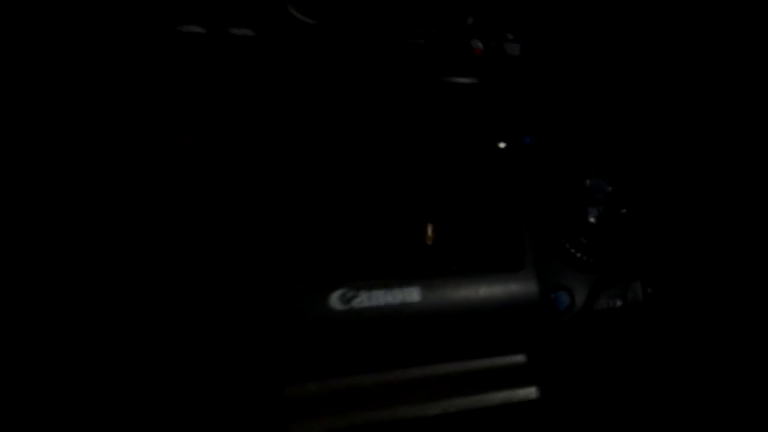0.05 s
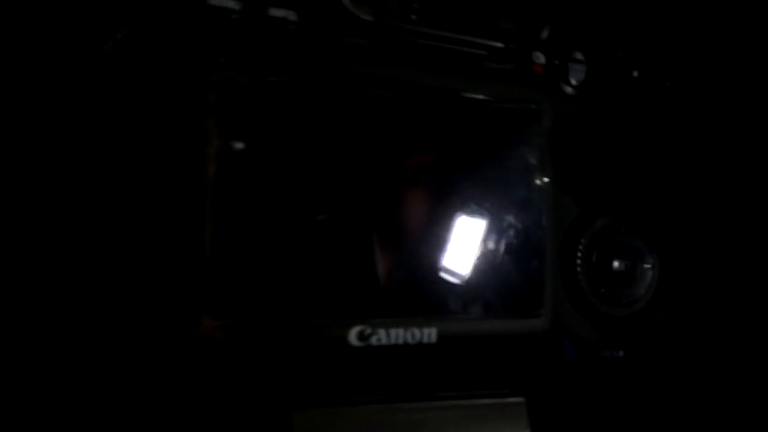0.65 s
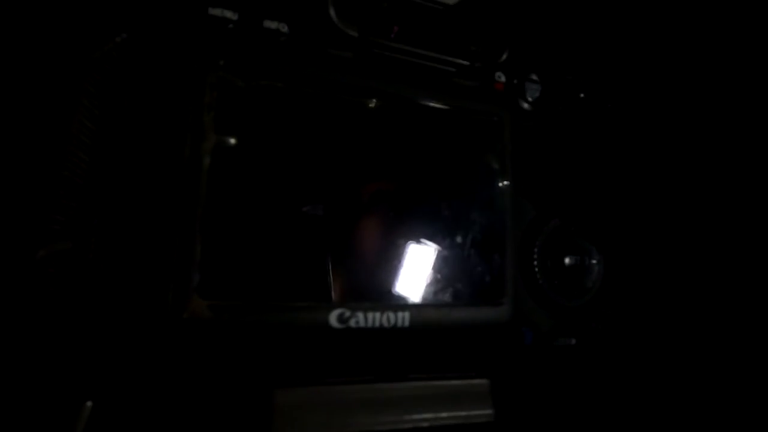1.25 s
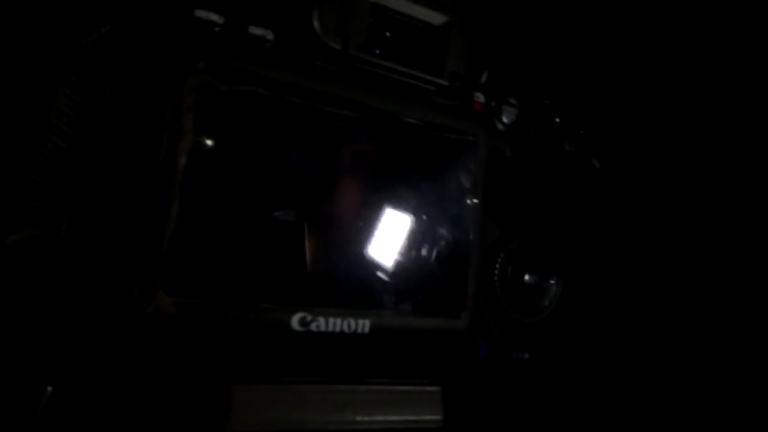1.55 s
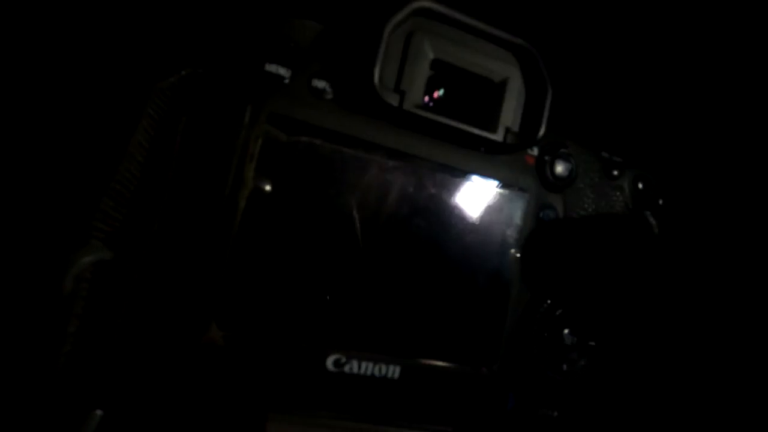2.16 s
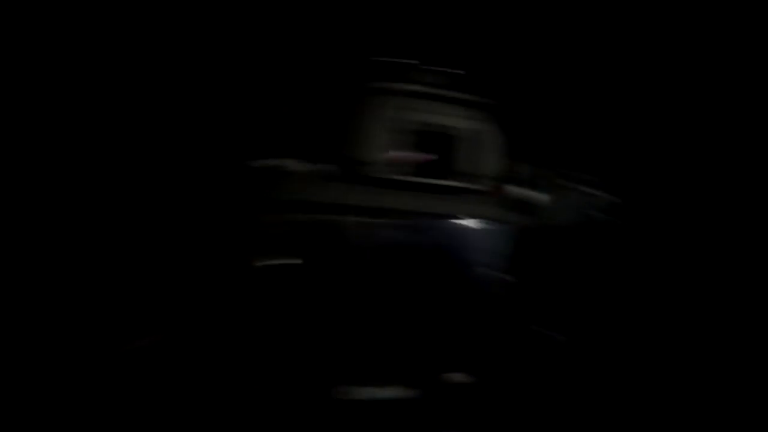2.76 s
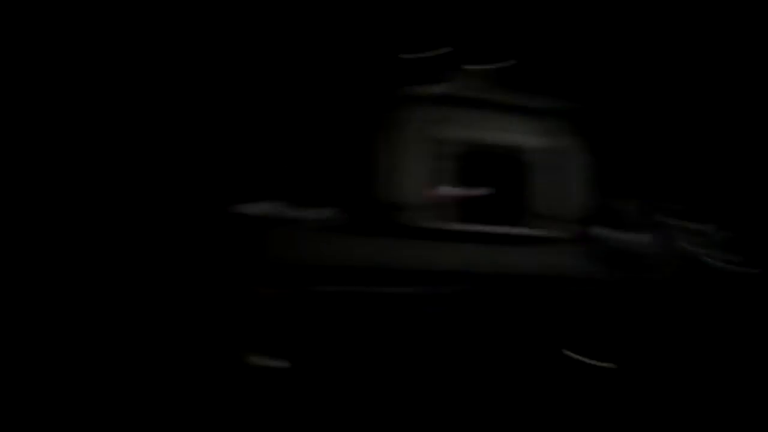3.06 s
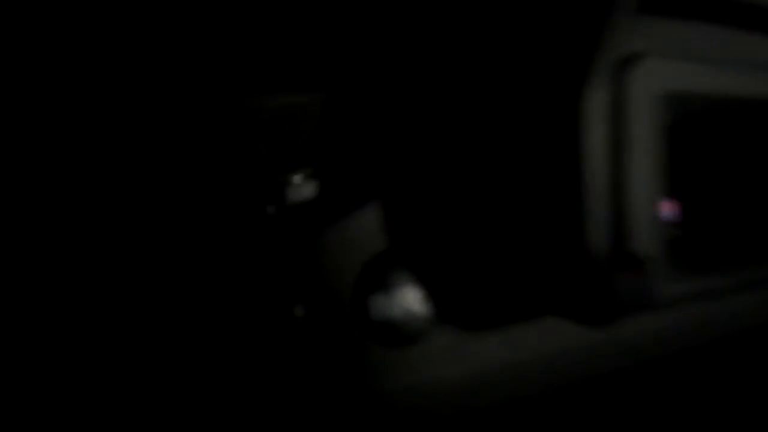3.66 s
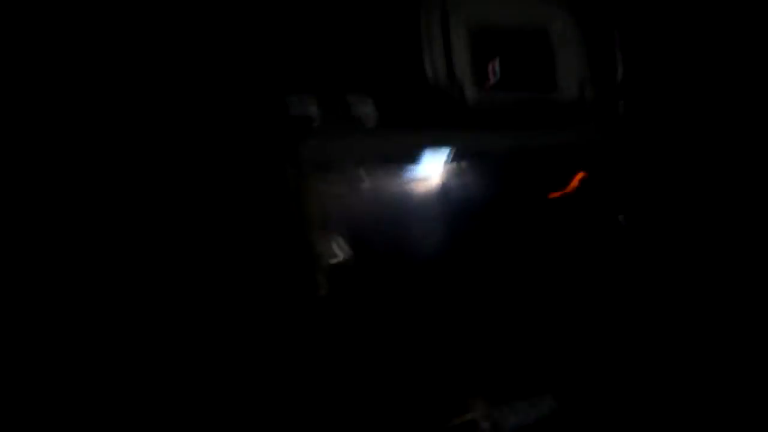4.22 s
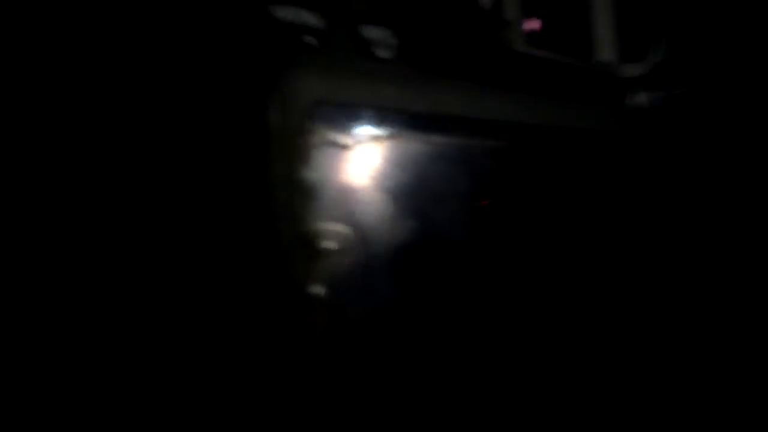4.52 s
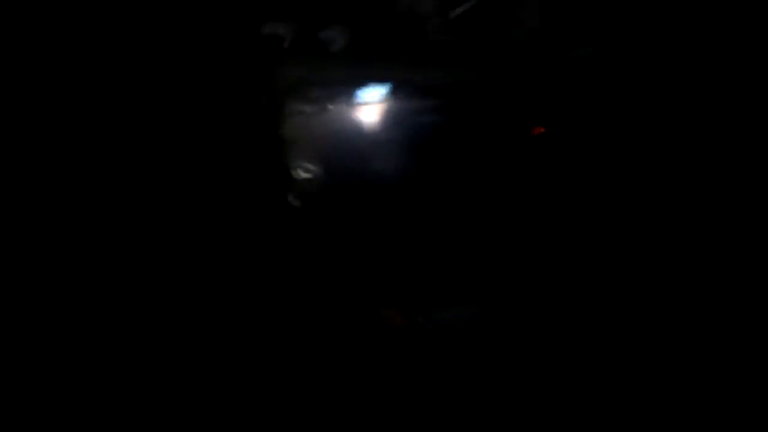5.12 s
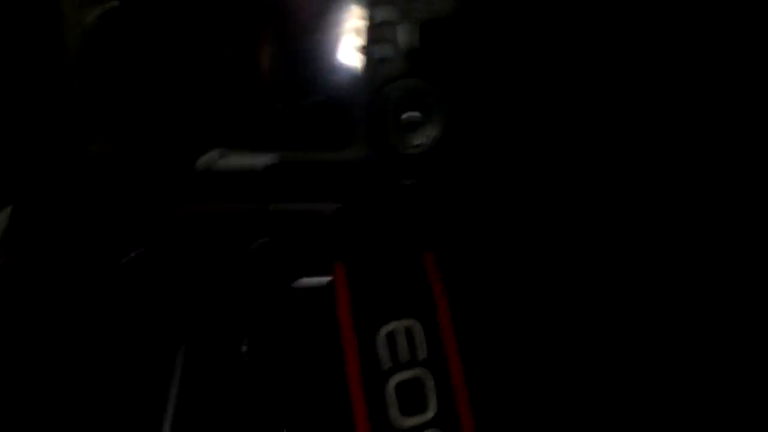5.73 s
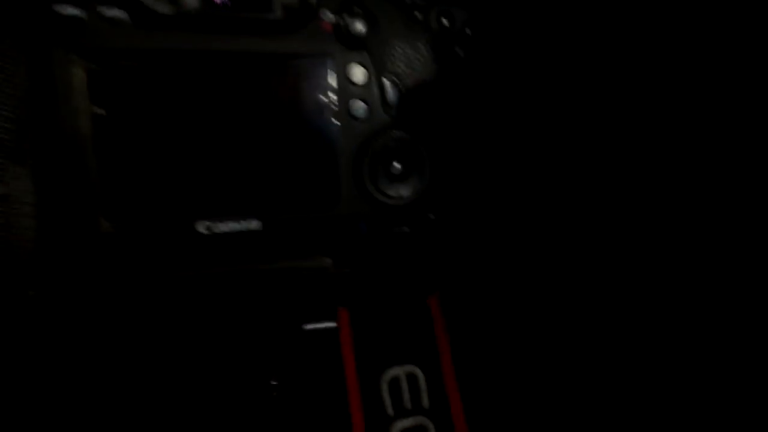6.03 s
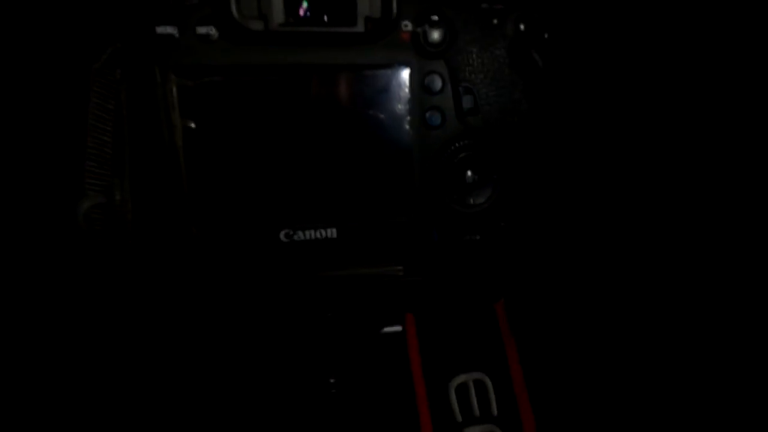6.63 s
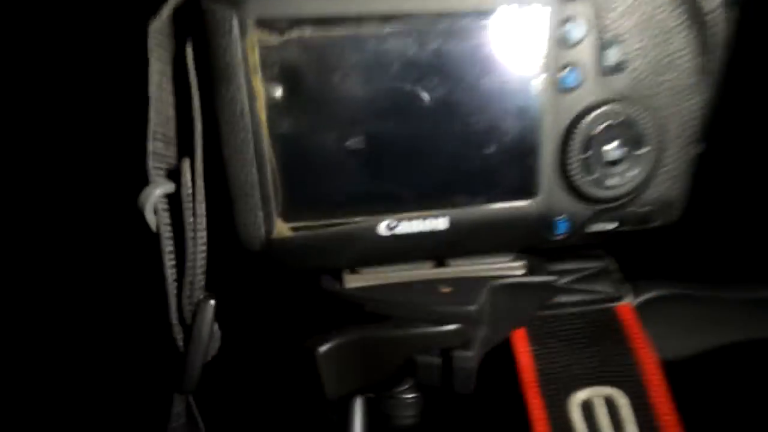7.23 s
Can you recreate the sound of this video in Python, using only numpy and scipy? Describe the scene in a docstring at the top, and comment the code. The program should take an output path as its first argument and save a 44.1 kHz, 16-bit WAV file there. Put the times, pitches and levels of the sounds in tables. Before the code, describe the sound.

Irregular clicks and thumps of a camera being fitted onto a tripod, over soft sleeve and strap swishing and low handling rumble.

```python
"""Seating a camera on a tripod

A camera is handled right at the microphone. Impacts and friction excite the damped modes of its
plastic casing, which knocks, scrapes and thumps on the mount; the foot squeaks by stick-slip, the
metal plate slides home, the latch snaps, and strap fittings tick and clink. Sleeve and strap swish
with every move and the hands rumble through the housing, over a faint outdoor background."""
import sys
import numpy as np
from scipy import signal
from scipy.fft import rfft, irfft, next_fast_len
from scipy.io import wavfile
from scipy.ndimage import uniform_filter1d, map_coordinates

SR = 44100
rng = np.random.default_rng(int(sys.argv[2]) if len(sys.argv) > 2 else 0)


def dump(signal):
    """Clip the signal to [-1, 1] and save it as 16-bit WAV at the path in sys.argv[1]."""
    limited = np.clip(np.atleast_2d(signal).T, -1, 1)
    pcm = np.round(limited * 32767).astype(np.int16)
    wavfile.write(sys.argv[1], SR, pcm)


N = 321162

# hard contacts (time [s], pitch of the struck spot [Hz], low [dB], mid [dB], high [dB], jolt [dB])
KNOCKS = [(0.666, 2380, -58, -43, -77, -62), (0.72, 2440, -33, -30.5, -56, -38),
          (0.763, 2250, -40.5, -34, -56, -48.5), (0.7724, 1340, -58, -49, -62, -69),
          (1.391, 1000, -46, -46, -67, -68), (1.884, 2100, -33, -25.5, -52.5, -36.5),
          (1.9123, 2140, -37.5, -28, -41, -29), (1.9261, 660, -40.5, -43, -60, -34),
          (1.9319, 2790, -36, -33.5, -49.5, -34), (2.14, 660, -47.5, -51, -61.5, -57),
          (2.1528, 960, -45, -45.5, -60, -48.5), (2.2682, 2370, -45, -36, -54.5, -36.5),
          (2.4729, 900, -51.5, -53, -68, -46.5), (2.5699, 2230, -52.5, -42.5, -50, -42.5),
          (2.871, 2690, -51, -49, -61, -65.5), (3.053, 2160, -46, -37.5, -44, -56.5),
          (3.3349, 2390, -36.5, -25.5, -33, -29), (3.423, 890, -20.5, -27.5, -42.5, -25),
          (3.457, 1180, -20, -30, -48, -35), (3.6457, 2990, -38, -46, -41.5, -43),
          (3.7134, 2780, -32, -28, -54.5, -43), (3.7578, 1010, -41.5, -56, -71, -47.5),
          (4.3886, 520, -29.5, -42, -45, -34), (4.3982, 1070, -28.5, -38, -32.5, -30.5),
          (4.5109, 2130, -48, -51, -65, -42)]
# drags over the mount (start [s], end [s], pitch of the rubbed spot [Hz], low [dB], mid [dB], high [dB])
SCRAPES = [(2.218, 2.263, 2450, -56, -53, -60.5), (2.288, 2.3, 590, -47.5, -50, -52.5),
           (2.887, 2.931, 1730, -63, -54.5, -63), (3.368, 3.454, 1740, -48, -41, -53.5),
           (3.446, 3.468, 1120, -30.5, -37.5, -44), (3.499, 3.665, 860, -48.5, -52, -62.5),
           (3.597, 3.831, 2780, -46, -51, -61.5), (3.851, 3.875, 776, -47, -60.5, -67.5),
           (3.912, 3.936, 750, -56, -66, -74), (4.357, 4.422, 500, -35.5, -46, -47.5),
           (4.588, 4.641, 1425, -49, -43, -55.5), (4.809, 4.851, 1710, -63, -53.5, -64),
           (4.981, 5.12, 435, -51.5, -45, -64.5), (5.04, 5.156, 1037, -44.5, -43, -56.5)]
# light contacts of strap fittings and fingernails (time [s], mid [dB], high [dB])
TICKS = [(0.7115, -67, -53), (0.8969, -50, -54.5), (0.9305, -56, -76), (0.981, -88, -62),
         (1.3335, -63, -68), (1.379, -61, -83), (1.906, -63, -40.5), (2.2273, -57, -61),
         (2.2842, -43.5, -49.5), (2.6212, -45, -52), (2.673, -57, -54), (2.7268, -47.5, -52),
         (2.739, -53, -47), (2.7663, -47, -54), (2.8146, -49.5, -57), (3.063, -56, -53.5),
         (4.3988, -29.5, -32.5), (4.836, -50.5, -69), (4.9815, -48.5, -63)]
# low, mid and high bands of a contact (lower edge [Hz], upper edge [Hz])
CONTACT_BANDS = [(300, 1400), (1400, 3400), (3400, 15000)]
# soft bumps of the camera's weight on its support (time [s], level [dB], frequency [Hz])
BUMPS = [(1.557, -50, 130), (2.902, -48, 220), (2.945, -46.5, 100), (3.294, -37.5, 80), (3.431, -29.5, 243),
         (3.459, -30, 84), (3.481, -38.5, 135), (4.317, -27.5, 129), (4.372, -32, 124), (4.402, -30.5, 282),
         (4.589, -41, 130), (4.822, -46.5, 139), (5.355, -53.5, 200)]
# the foot squeaking on the mount (time [s], level [dB], pitch [Hz])
SQUEAK_CURVE = [(3.355, -66.5, 1600), (3.358, -40.5, 1598), (3.382, -33, 1700), (3.4, -40.5, 1640),
                (3.42, -37, 1670), (3.428, -71.5, 1647)]
# friction envelopes (time [s], level [dB])
PLATE_ENVELOPE = [(4.28, -67.5), (4.298, -42), (4.311, -27), (4.328, -32), (4.342, -38), (4.349, -34),
                  (4.368, -34.5), (4.39, -73), (4.41, -73.5)]
WEBBING_ENVELOPE = [(6.0, -83), (6.15, -68), (6.35, -66), (6.52, -55.5), (6.62, -50.5), (6.69, -61),
                    (6.735, -49.5), (6.79, -80), (6.85, -83.5)]
# taps of a loose fitting on the tripod (time [s], level [dB], crack relative to ring [dB])
LOOSE_TAPS = [(6.9288, -60, -4), (6.9706, -55, -6), (7.0102, -56.5, -23)]
# strokes of sleeve and strap (start [s], duration [s], rub [dB], swish [dB])
CLOTH_STROKES = [(-.07, .16, -62, -51), (.205, 0.14, -55.5, -53), (.385, 0.11, -60.5, -53.5),
                 (.51, 0.33, -64, -55.5), (.88, 0.066, -65.5, -59), (1.04, .22, -62, -64),
                 (1.3, 0.27, -60, -61.5), (1.6, 0.15, -64, -59.5), (1.8, 0.23, -57.5, -53),
                 (2.08, 0.24, -62, -57.5), (2.35, 0.11, -69, -63), (2.54, 0.24, -62.5, -59),
                 (2.69, 0.35, -60.5, -57), (2.95, 0.19, -57, -53), (3.12, 0.13, -55.5, -49.5),
                 (3.24, 0.097, -65.5, -50.5), (3.88, .11, -62, -58.5), (4.03, 0.48, -61, -53.5),
                 (4.44, 0.4, -57, -56.5), (4.73, 0.23, -60, -58), (4.95, 0.37, -54, -53),
                 (5.3, 0.22, -62, -57), (5.69, 0.31, -72.5, -59), (6.14, 0.41, -68.5, -66),
                 (6.37, 0.35, -54.5, -53), (6.7, 0.27, -68, -61.5), (7.17, 0.32, -65.5, -62.5)]
# the hands changing their hold (start [s], duration [s], sway [dB], flutter [dB])
GRIP_SHIFTS = [(.23, 0.13, -60, -58.5), (.35, 0.21, -57, -63.5), (1.3, 0.42, -55.5, -64),
               (1.71, .17, -42, -65), (1.94, 0.23, -48, -72), (2.19, .17, -39.5, -53),
               (2.38, 0.35, -51.5, -86), (2.87, 0.83, -49, -57.5), (3.56, .26, -49, -43),
               (3.8, .16, -71, -54.5), (4.42, 0.32, -46, -46.5), (4.79, 0.12, -46, -48),
               (4.95, 0.14, -52, -45.5), (5.06, 0.26, -53.5, -58.5), (5.33, 0.085, -62, -51),
               (5.56, 0.21, -52.5, -72), (5.82, 0.32, -53, -76), (6.19, 0.12, -56.5, -86),
               (6.72, 0.24, -59, -74.5)]

# normal modes of each part (frequency [Hz], level [dB], decay time T60 [s])
CASING_MODES = [(399, -8, 0.021), (589, 1.5, 0.02), (718, -3, 0.048), (1045, -0.5, 0.028),
                (1230, -12, 0.0093), (1480, -7.5, 0.012), (1968, -0.5, 0.03), (2200, -1, 0.012),
                (2580, -0.5, 0.03), (3800, -4, 0.011), (4660, 1, 0.01), (6370, -2.5, .008),
                (7660, -24.5, 0.0077), (12100, -15.5, .004)]
HEAD_MODES = [(161, -5, 0.087), (248, -4.5, 0.046), (420, 2.5, 0.057), (519, -2, 0.055), (612, -4, 0.08),
              (720, 6.5, 0.04), (1338, -17.5, 0.066)]  # the hollow tripod head
PLATE_MODES = [(794, -11, 0.03), (1097, -14.5, 0.07), (1616, -10.5, 0.0076), (2691, 1.5, 0.04),
               (3000, -2.5, 0.0089), (3730, -0.5, 0.016), (4800, -2, 0.016), (6870, -12.5, 0.013),
               (7407, -28, 0.047), (12500, -14.5, .004)]
LATCH_MODES = [(7600, -6, .02), (11200, -4, .012), (12800, -0.5, .012)]
STRAP_RING_MODES = [(1070, -5, 0.13), (1380, -7, 0.06), (2000, -1, 0.058), (2735, 9, 0.0069),
                    (3430, -4, 0.085), (4113, -6, 0.045), (5080, -10.5, 0.045), (7520, -9, 0.05)]
TRIPOD_FITTING_MODES = [(918, -14, 0.19), (1130, -9.5, 0.065), (1390, -8, 0.045), (1750, -11, 0.12),
                        (2400, -22, 0.026), (2635, 2, 0.04), (2850, 1.5, 0.033), (3170, -8.5, .03),
                        (3500, -1, 0.035), (3970, -4, 0.038), (4610, -5, 0.13), (4990, -4.5, 0.091),
                        (5850, -21, 0.027), (8200, -15, 0.019)]
LOOSE_FITTING_MODES = [(720, -9, 0.09), (1750, 2, 0.022), (3270, -7, 0.027)]

# noise spectra of cloth, hands and outdoor air (frequency [Hz], relative spectral density [dB])
RUB_SPECTRUM = [(150, -40.5), (280, 3.5), (430, 0.5), (750, -4.5), (1100, -3), (1600, -6.5), (3000, -42)]
SWISH_SPECTRUM = [(500, -47.5), (1100, -4), (1600, -0.5), (3000, -1), (4200, -3), (5400, -6.5),
                  (7900, -13.5), (9000, -13.5), (13000, -23.5), (15500, -42.5)]
WEBBING_SPECTRUM = [(1500, -21), (2400, -21), (2900, -.5), (3300, 0), (3700, -11.5), (4400, -0.5),
                    (5200, -10.5), (6000, -8), (7800, -17.5), (10000, -28)]
SWAY_SPECTRUM = [(10, -5), (22, 1), (35, 8.5), (60, -3.5), (90, -7), (160, -63.5)]
FLUTTER_SPECTRUM = [(50, -33), (100, -8.5), (150, 5.5), (220, 0.5), (320, -10.5), (600, -44.5)]
AIR_SPECTRUM = [(20, 16), (80, -27.5), (190, 3.5), (500, -18.5), (1500, -11.5), (3000, -40), (8000, -17),
                (9500, -19.5), (15000, -43.5)]

# level difference between the microphone ports (frequency [Hz], left minus right [dB])
PORT_BALANCE = [(60, -5), (200, -3), (600, -4.5), (1230, -3.5), (2260, 0), (4140, -.5), (7580, -2),
                (13900, -2)]
# phase difference between the ports (frequency [Hz], lag of the left port [rad])
PORT_LAG = [(100, 0.5), (500, 0.33), (860, .5), (2300, 0.34), (4300, 0.89), (7500, 1.3249), (13000, 2)]
# share of contact and cloth sound that differs between the ports (frequency [Hz], gain [dB])
HOUSING_SIDE = [(800, -13), (1800, -23), (8000, -20)]
CLOTH_SIDE = [(300, -9), (1200, -9), (2500, -6), (4200, -7), (7500, -4), (13000, -18)]
# frequency response of the microphone (frequency [Hz], gain [dB])
MIC_RESPONSE = [(5500, 0), (7000, 1.5), (8000, 3), (9000, -5), (10500, -3), (12500, -4), (14500, -7)]


def knocks(seated_s=3.3, spot_t60=0.012, swell_rise_s=0.0082):
    """Impact excites the modes of casing and tripod head; once seated, the camera damps the head."""
    out, lead, t = np.zeros(N), clock(.015), clock(.2)
    for s, hz, *levels_db, jolt_db in KNOCKS:
        spot = unit(np.sin(2 * np.pi * hz * t) * amp(-60 * t / spot_t60))
        blow = strike(CASING_MODES, chatter_s=0.00062, crack_db=3, crack_t60=0.015) + amp(3) * spot
        add(out, s, voiced(blow, CONTACT_BANDS, levels_db, seconds=0.0074))
        head_db = (levels_db[0] + jolt_db) / 2 + (-3 if s < seated_s else -11)
        head = ringing(HEAD_MODES, scatter_db=1.5, detune=0.012)
        add(out, s, amp(head_db) * levelled(head, seconds=0.02))
        # a faint, brief swell of noise leads into each knock and softens its attack
        swell = rng.standard_normal(len(lead)) * np.exp((lead - lead[-1]) / swell_rise_s)
        add(out, s - lead[-1], amp(-21) * voiced(swell, CONTACT_BANDS, levels_db, seconds=.007))
    return out


def scrapes(spot_t60=0.029):
    """Sliding friction: rough plastic catches and slips, driving the casing's modes and the rubbed spot."""
    out = np.zeros(N)
    catching = amp(3 * wobble(220))
    for start, end, hz, *levels_db in SCRAPES:
        size = max(int((end - start) * SR), SR // 200)
        slips = grit(size, spread_db=3.5) * signal.windows.tukey(size, .5)
        slips *= catching[int(start * SR):][:size]
        casing = unit(signal.fftconvolve(slips, ringing(CASING_MODES, scatter_db=7, detune=0.03)))
        spot = unit(signal.fftconvolve(slips, ringing([(hz, 0, spot_t60)], scatter_db=0, detune=0)))
        rasp = unit(butterworth(np.pad(slips, (0, len(casing) - size)), 2, 4200))
        scrape = casing + amp(-3) * spot + amp(4) * rasp
        add(out, start, voiced(scrape, CONTACT_BANDS, levels_db, seconds=size / SR))
    return out


def jolts(rock_hz=136, spread=.11):
    """Knocks and bumps pass momentum to the support: (time [s], level [dB], frequency [Hz])."""
    return [(s, db, rock_hz * np.exp(spread * rng.standard_normal())) for s, *_, db in KNOCKS] + BUMPS


def thumps(t60=0.045, ripple_ratio=2.065, sag_ratio=0.21):
    """Damped free vibration: each jolt rocks the support, with a quicker ripple and a slower sag."""
    out = np.zeros(N)
    for s, db, hz in jolts():
        modes = [(hz, 0, t60), (hz * ripple_ratio, -9, t60), (hz * sag_ratio, -8, 2 * t60)]
        add(out, s, amp(db) * levelled(ringing(modes, scatter_db=2.5, detune=.04), seconds=.03))
    return out


def plate_and_latch():
    """Friction drives the plate's modes; the latch snaps, rebounds, and its spring catch rings."""
    slide_db, = curves(PLATE_ENVELOPE)
    slips = grit(N, spread_db=4)
    rubbing = unit(signal.fftconvolve(slips, ringing(PLATE_MODES, scatter_db=1, detune=.005))[:N])
    rasp = coloured(grit(N, spread_db=4.5), [(500, -23), (2500, 0), (4300, 4), (7900, -8), (10000, -24)])
    out = (amp(slide_db) - amp(slide_db.min())) * unit(rubbing + amp(-8) * rasp)
    add(out, 4.314, clink(PLATE_MODES, db=-23, crack_t60=0.012))
    add(out, 4.3166, clink(PLATE_MODES, db=-24.5, crack_t60=0.0071))
    add(out, 4.3993, clink(LATCH_MODES, db=-34.5, crack_t60=0.01))
    return out


def squeak():
    """Stick-slip oscillation: the foot sounds an unsteady pitch before it drops into place."""
    db, hz = curves(SQUEAK_CURVE)
    phase = 2 * np.pi * np.cumsum(hz * (1 + .14 * wobble(1200))) / SR
    tone = unit(np.sin(phase) * amp(3.3 * wobble(250)))
    return (amp(db) - amp(db.min())) * tone


def fittings():
    """Struck metal rings in inharmonic modes: a strap ring, a tripod fitting and a loose, swinging one."""
    out = np.zeros(N)
    add(out, 2.5912, clink(STRAP_RING_MODES, db=-36, crack_t60=0.03))
    add(out, 6.8292, clink(TRIPOD_FITTING_MODES, db=-34.5, crack_t60=0.07))
    for s, db, crack_db in LOOSE_TAPS:
        add(out, s, clink(LOOSE_FITTING_MODES, db=db, crack_t60=0.025, crack_db=crack_db))
    return out


def ticks():
    """Light impacts excite only the upper modes of the casing."""
    out = np.zeros(N)
    for s, *levels_db in TICKS:
        tap = strike(CASING_MODES, chatter_s=0.001, crack_db=2.5, crack_t60=0.021)
        add(out, s, voiced(tap, CONTACT_BANDS[1:], levels_db, seconds=0.0069))
    return out


def cloth():
    """Friction noise of countless fibres: a dull rub, a bright swish, and webbing sliding in the hand."""
    rubbing, swishing = moves(CLOTH_STROKES, rest_db=[-71, -69.5]) * amp(wobble(45))
    webbing_db, = curves(WEBBING_ENVELOPE)
    rub = rubbing * coloured(patchy(grit(N, spread_db=3), depth_db=3), RUB_SPECTRUM)
    fibres = coloured(patchy(grit(N, spread_db=1.5), depth_db=3), SWISH_SPECTRUM)
    swish = swishing * (fibres + amp(-19.5) * crackle())
    webbing = amp(webbing_db) * coloured(grit(N, spread_db=1.5), WEBBING_SPECTRUM)
    return rub + swish + webbing


def crackle(catches_per_s=260):
    """Shot noise: threads catch and let go at random, each release tapping the casing."""
    catches = (rng.random(N) < catches_per_s / SR) * rng.uniform(-1, 1, N)
    catches *= amp(3 * rng.standard_normal(N))
    tap = strike(CASING_MODES, chatter_s=0.00027, crack_db=3, crack_t60=0.0035)
    return unit(signal.fftconvolve(catches, tap)[:N])


def grip(shudder_t60=0.52):
    """Structure-borne noise: fingers sway and flutter the housing, which also shudders after each jolt."""
    swaying, fluttering = moves(GRIP_SHIFTS, rest_db=[-73.5, -69.5])  # at rest the hands still tremble
    shudder_power = np.zeros(N)
    for s, db, _ in jolts():
        add(shudder_power, s, amp(db - 60 * clock(1) / shudder_t60) ** 2)
    shudder = np.sqrt(shudder_power)
    sway = np.hypot(swaying, amp(-12) * shudder) * amp(1.5 * wobble(14))
    flutter = np.hypot(fluttering, amp(-15) * shudder) * amp(1.7 * wobble(36))
    return (sway * coloured(rng.standard_normal(N), SWAY_SPECTRUM)
            + flutter * coloured(rng.standard_normal(N), FLUTTER_SPECTRUM))


def reflections(x, t60=0.16):
    """Diffuse reflection from nearby things returns a short, dull tail."""
    t = clock(.4)
    tail = butterworth(rng.standard_normal(len(t)), 1, 3500) * amp(-60 * t / t60)
    return signal.fftconvolve(x, tail / np.linalg.norm(tail))[:N]


def outdoor_air():
    """Stationary coloured noise forms the faint outdoor background."""
    return amp(-67.5) * coloured(rng.standard_normal(N), AIR_SPECTRUM)


def ringing(modes, scatter_db, detune):
    """Impulse response as a sum of damped modes, which vary a little with the spot touched."""
    t = clock(.2)
    hz, db, t60 = np.transpose(modes)[:, :, None]
    strength, shift, polarity = rng.standard_normal((3, len(modes), 1))
    envelopes = amp(db + scatter_db * strength - 60 * t / t60)
    return np.sum(envelopes * np.sign(polarity) * np.sin(2 * np.pi * hz * (1 + detune * shift) * t), 0)


def strike(modes, chatter_s, crack_db, crack_t60):
    """Forced response: meeting surfaces chatter for an instant and the modes ring under a dry crack."""
    t = clock(.2)
    force = rng.standard_normal(len(t)) * np.exp(-(t / chatter_s) ** 2)
    ring = signal.fftconvolve(force, ringing(modes, scatter_db=2.5, detune=0.047))[:len(t)]
    crack = butterworth(rng.standard_normal(len(t)), 2, 4500) * amp(-60 * t / crack_t60)
    return unit(ring) + amp(crack_db) * unit(crack)


def clink(modes, db, crack_t60, crack_db=-6):
    """Free decay of a metal part struck once, under a noisy crack."""
    ring = ringing(modes, scatter_db=2.5, detune=0.003)
    t = np.arange(len(ring)) / SR
    crack = butterworth(rng.standard_normal(len(t)), 2, [1600, 5000], "band") * amp(-60 * t / crack_t60)
    return amp(db) * levelled(unit(ring) + amp(crack_db) * unit(crack), seconds=0.014)


def voiced(x, bands, levels_db, seconds):
    """Contact hardness sets how the energy divides among the frequency bands."""
    parts = [butterworth(x, 4, band, "band") for band in bands]
    return sum(amp(db) * levelled(part, seconds) for db, part in zip(levels_db, parts))


def grit(size, spread_db):
    """Friction as tiny slips of log-normal strength, 16 samples each."""
    noise = rng.standard_normal(size)
    slip_db = spread_db * np.repeat(rng.standard_normal(size // 16 + 1), 16)[:size]
    return unit(noise * amp(slip_db))


def patchy(x, depth_db):
    """Time-varying filtering: folds and hollows of the hand change the colour from moment to moment."""
    spectrogram = signal.stft(x, nperseg=512)[2]
    field = uniform_filter1d(rng.standard_normal(spectrogram.shape), size=6, axis=0)
    field = uniform_filter1d(field, size=18, axis=1)
    return signal.istft(spectrogram * amp(depth_db * unit(field)), nperseg=512)[1][:N]


def moves(rows, rest_db):
    """Amplitude follows a power of speed, one arch a move; moves add in energy over a resting level."""
    t = np.arange(N) / SR
    power = np.outer(amp(rest_db) ** 2, np.ones(N))
    for start, length, *levels_db in rows:
        during = (t > start) & (t < start + length)
        speed = np.abs(np.sin(np.pi * (t[during] - start) / length))
        exponent = 0.38 + 1.05 * length  # long moves swell gently
        power[:, during] += np.outer(amp(levels_db), speed ** exponent) ** 2
    return np.sqrt(power)


def amp(db):
    return 10 ** (np.asarray(db) / 20)


def unit(x):
    return x / np.sqrt(np.mean(x ** 2) + 1e-20)


def levelled(x, seconds):
    """Energy normalisation: x gets the energy of rms 1 held for that long."""
    return x * np.sqrt(seconds * SR / (np.sum(x ** 2) + 1e-20))


def clock(seconds):
    return np.arange(int(seconds * SR)) / SR


def along(points, hz):
    """Interpolation on a logarithmic frequency axis."""
    knots_hz, values = np.transpose(points)
    return np.interp(np.log(hz + 1), np.log(knots_hz + 1), values)


def curves(rows):
    """Linear interpolation in time of each later column, one value a sample."""
    times, *columns = np.transpose(rows)
    return [np.interp(np.arange(N) / SR, times, column) for column in columns]


def wobble(rate):
    """Smooth random modulation with rate knots a second."""
    return map_coordinates(rng.standard_normal(int(N * rate / SR) + 4), [np.arange(N) * rate / SR])


def butterworth(x, order, hz, kind="low"):
    return signal.sosfilt(signal.butter(order, hz, kind, fs=SR, output="sos"), x)


def filtered(x, response):
    """Linear filtering: the spectrum of x times a complex frequency response."""
    size = next_fast_len(N + SR // 2)
    return irfft(rfft(x, size) * response(np.fft.rfftfreq(size, 1 / SR)), size)[..., :N]


def shaped(x, gains_db):
    """Zero-phase filtering by a curve of (frequency [Hz], gain [dB])."""
    return filtered(x, lambda hz: amp(along(gains_db, hz)))


def coloured(x, spectrum):
    """Spectral shaping, normalised to rms 1."""
    return unit(shaped(x, spectrum))


def add(track, s, x):
    """Superposition of x on the track from time s."""
    part = track[max(round(s * SR), 0):][:len(x)]
    part += x[:len(part)]


def port(x, sign):
    """Path difference: the left (+1) or nearer right (-1) port takes half the level and phase gap."""
    return filtered(x, lambda hz: amp(sign * along(PORT_BALANCE, hz) / 2)
                    * np.exp(-1j * sign * along(PORT_LAG, hz) / 2))


def scene():
    """Superposition at two close ports: a common mid signal plus and minus a side signal."""
    body, rocking = knocks() + scrapes(), thumps()
    contacts = body + ticks() + squeak() + plate_and_latch() + fittings()
    air = outdoor_air()
    mid = contacts + amp(-20) * reflections(contacts) + rocking + cloth() + grip() + air
    # sound through the housing reaches the ports out of step: 1j turns it a quarter cycle,
    # and fresh random draws make it partly incoherent
    vibration = body + amp(-1) * (knocks() + scrapes())
    shaken = filtered(vibration, lambda hz: 1j * amp(along(HOUSING_SIDE, hz)))
    rocked = filtered(rocking, lambda hz: 1j * amp(-9)) + amp(-6) * thumps()
    brushed = shaped(cloth(), CLOTH_SIDE)
    side = amp(-3) * grip() + brushed - shaken - rocked
    return np.array([port(mid, 1) + side, port(mid, -1) - side])


def record(dry, mono_from_s=4.05, top_hz=14500):
    """The stereo image closes to mono; the microphone's response colours and band-limits the treble."""
    mid = dry.mean(0)
    width = np.clip((mono_from_s - np.arange(N) / SR) * 10, 0, 1)
    return filtered(mid + width * (dry - mid), lambda hz: amp(along(MIC_RESPONSE, hz)) * (hz < top_hz))


dry = scene()
out = record(dry)
dump(out)
```